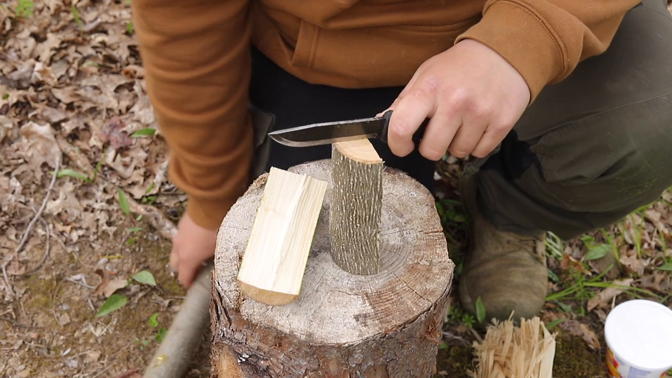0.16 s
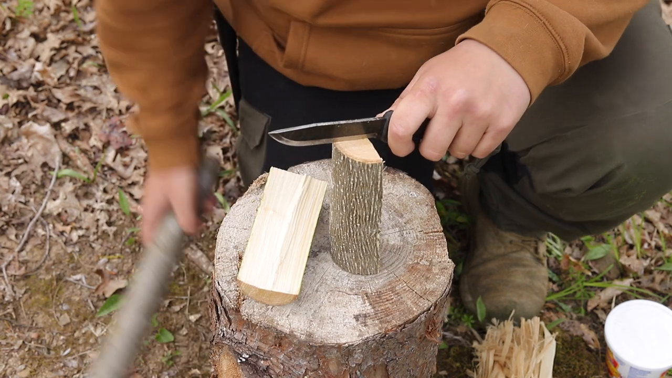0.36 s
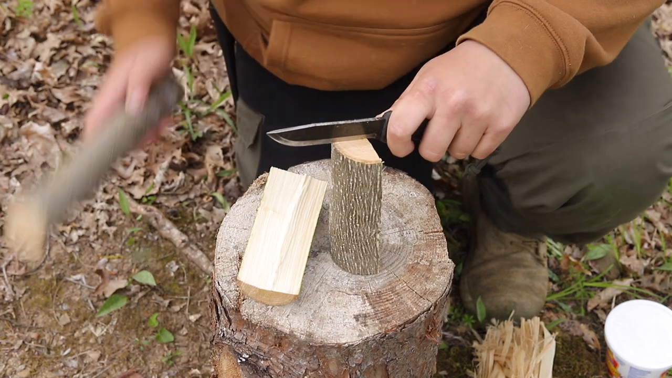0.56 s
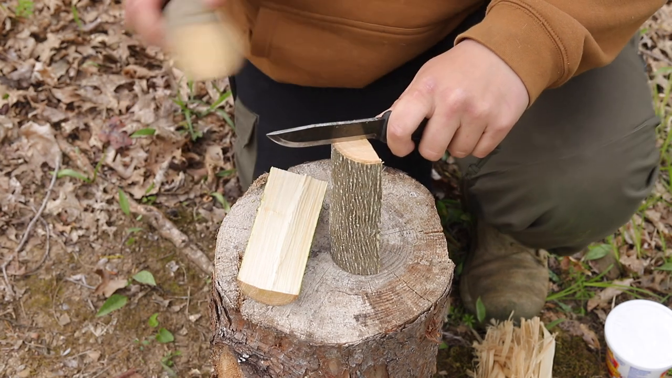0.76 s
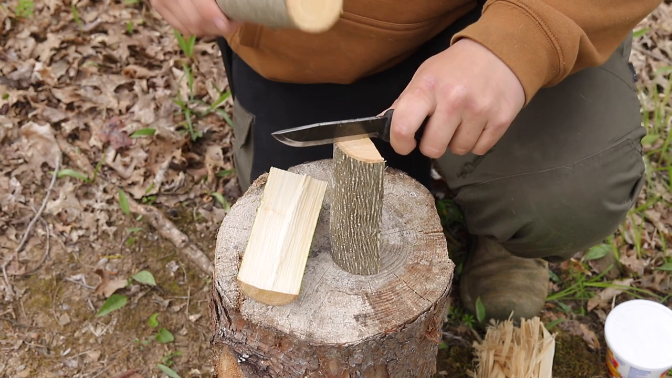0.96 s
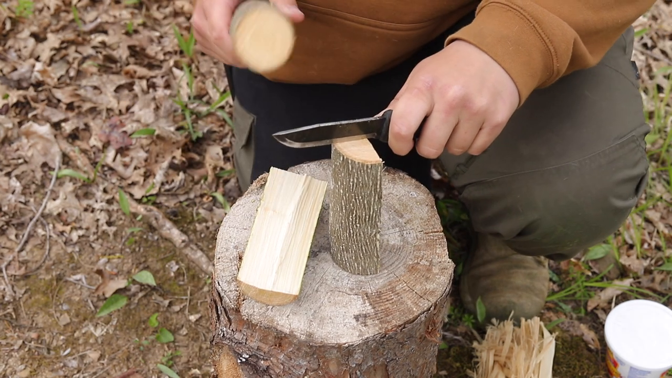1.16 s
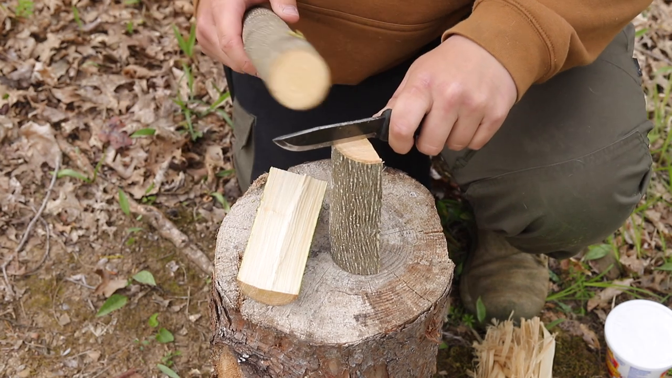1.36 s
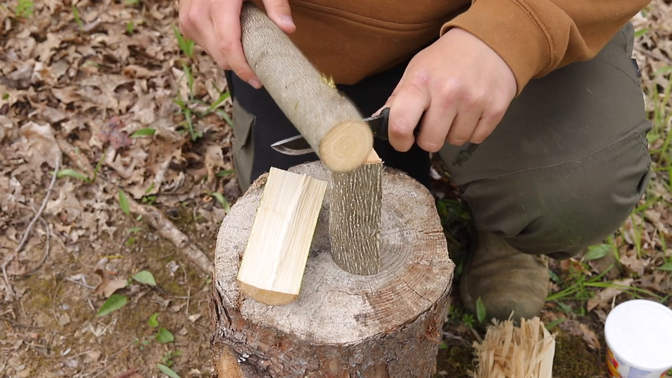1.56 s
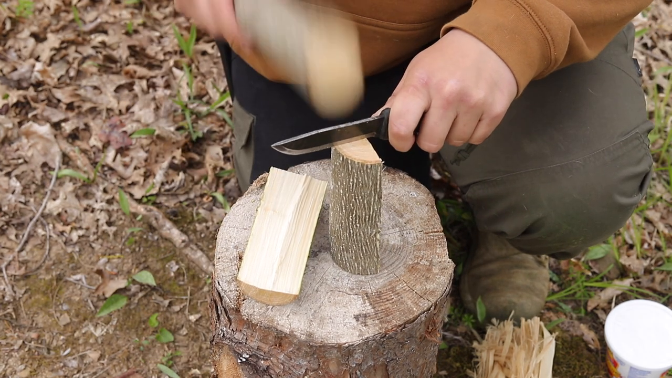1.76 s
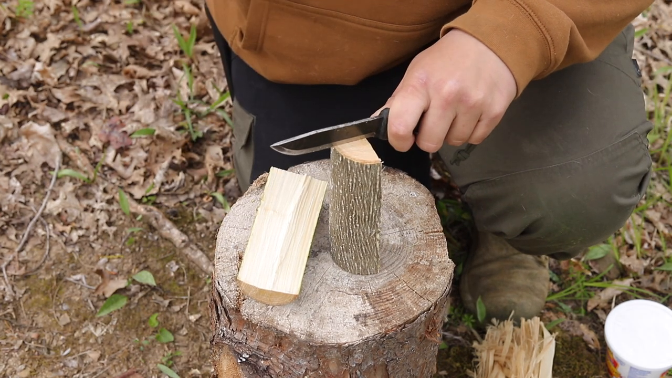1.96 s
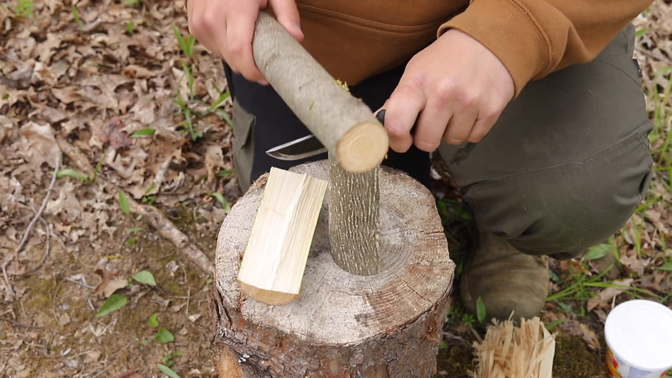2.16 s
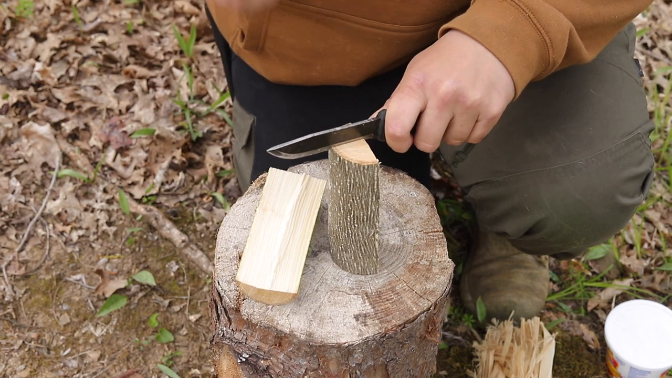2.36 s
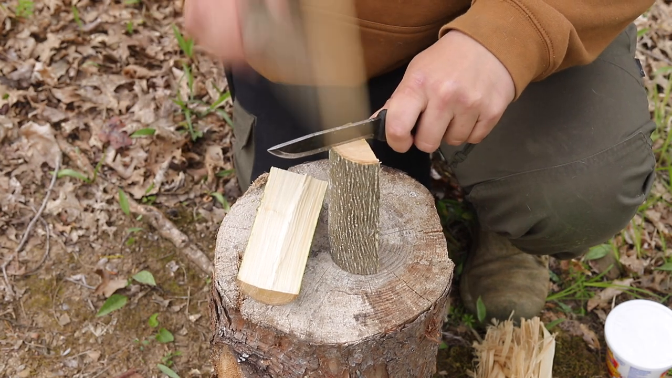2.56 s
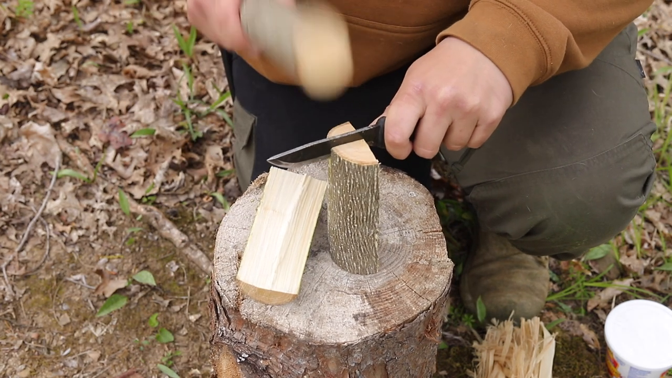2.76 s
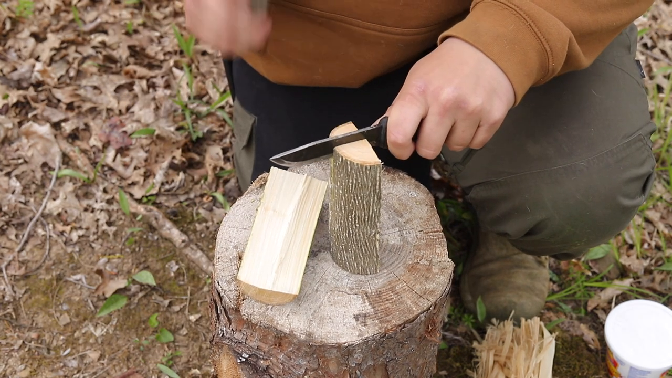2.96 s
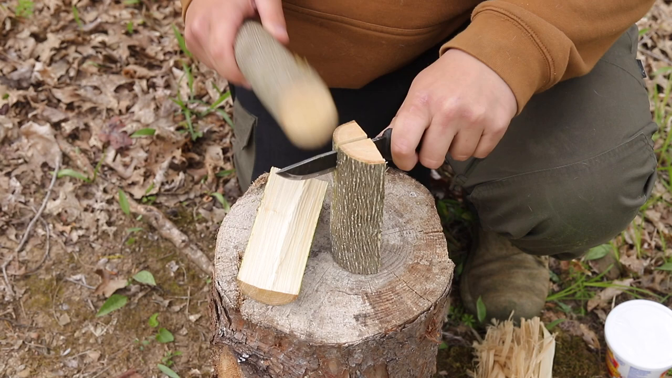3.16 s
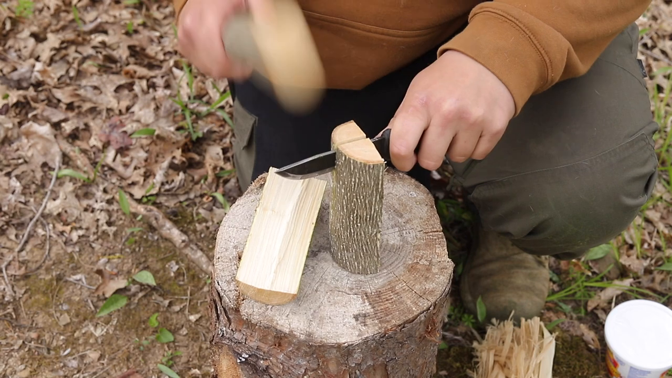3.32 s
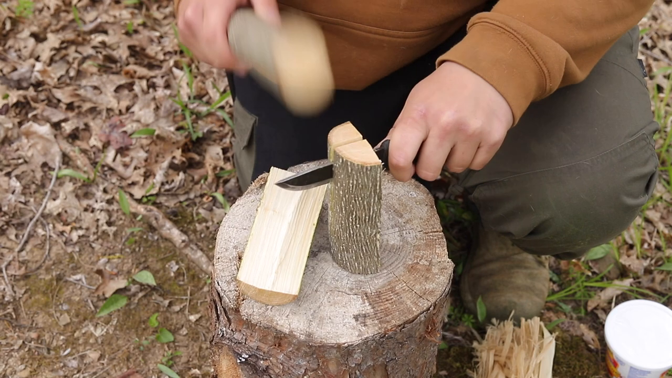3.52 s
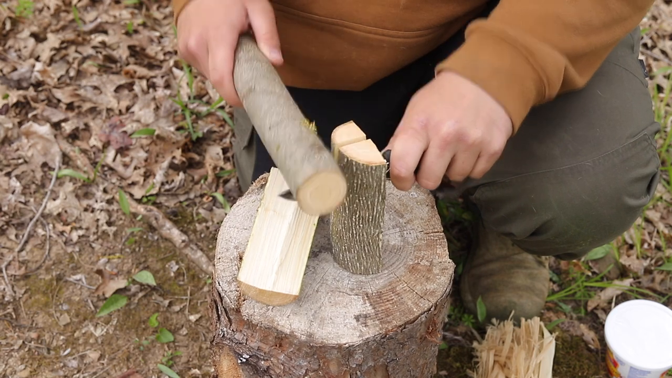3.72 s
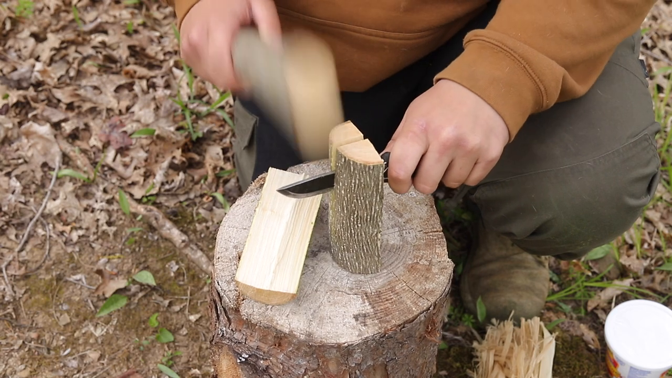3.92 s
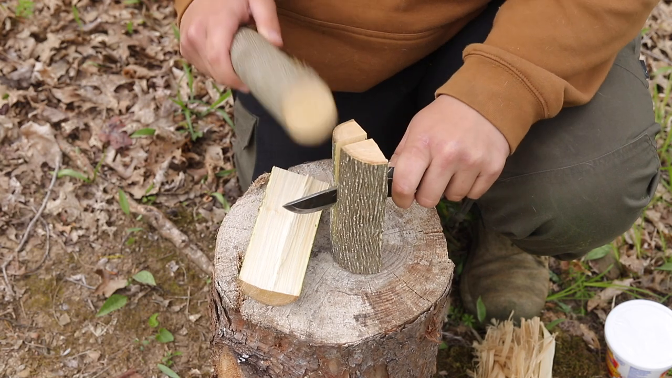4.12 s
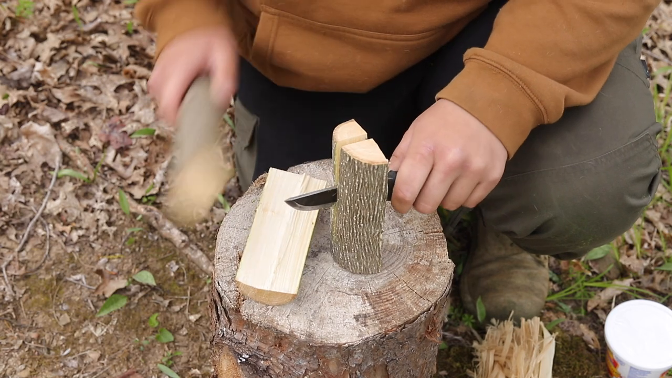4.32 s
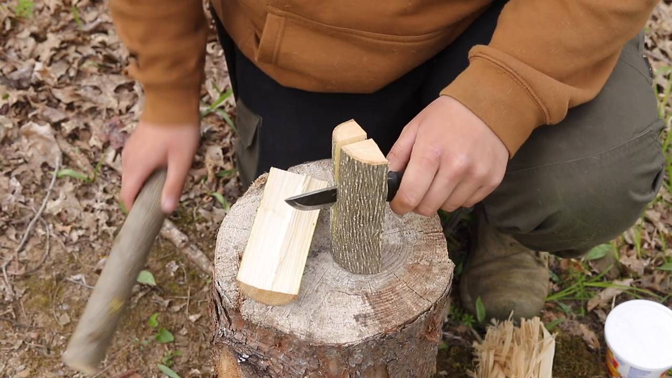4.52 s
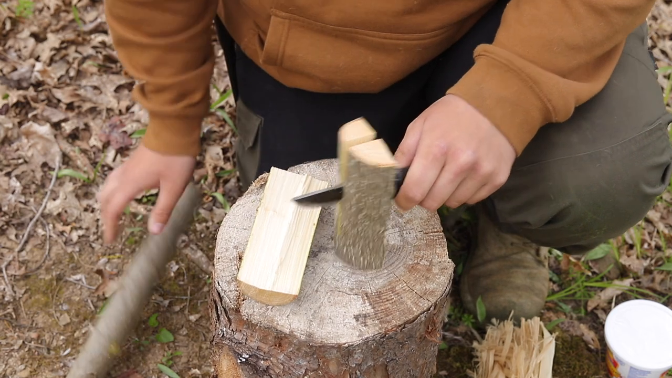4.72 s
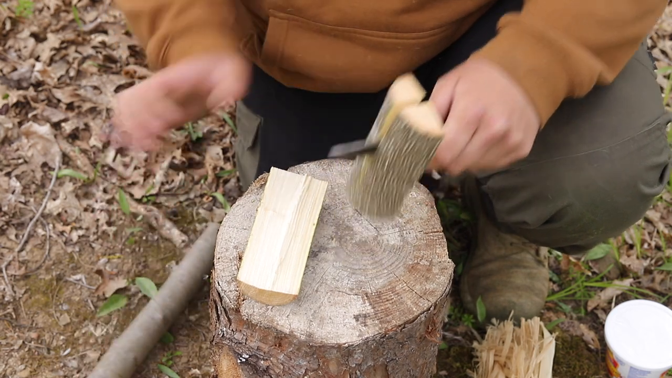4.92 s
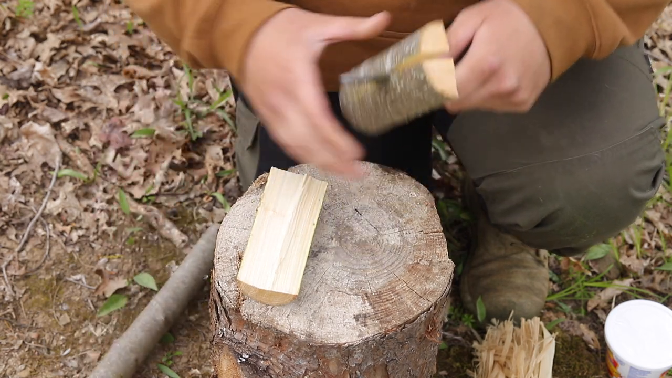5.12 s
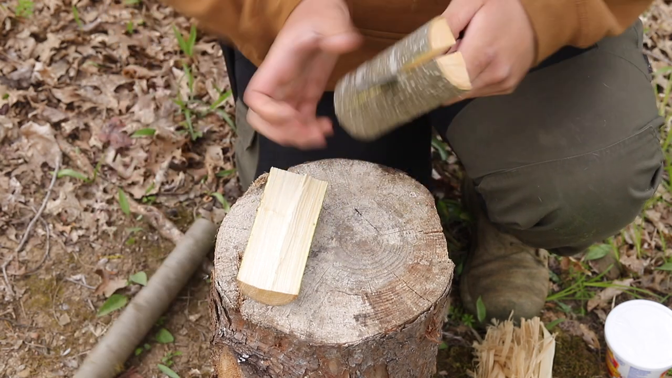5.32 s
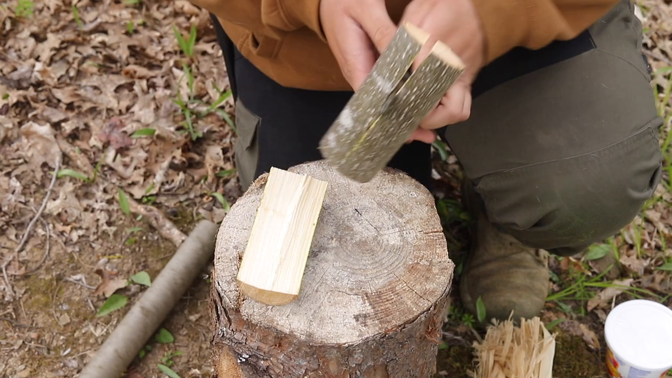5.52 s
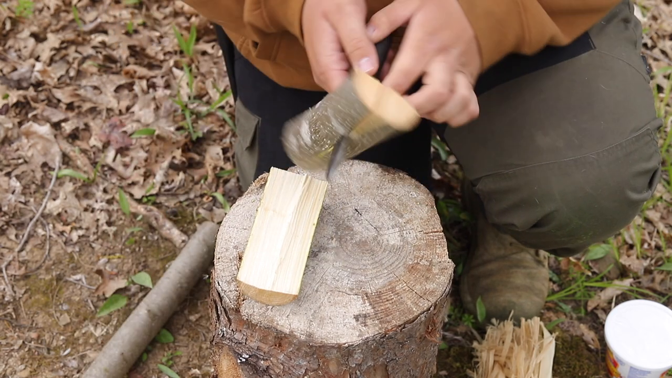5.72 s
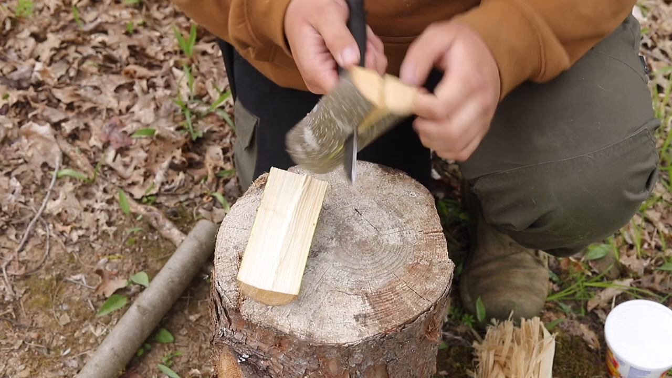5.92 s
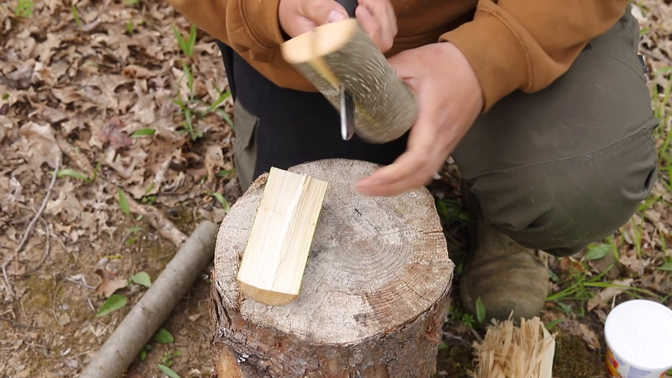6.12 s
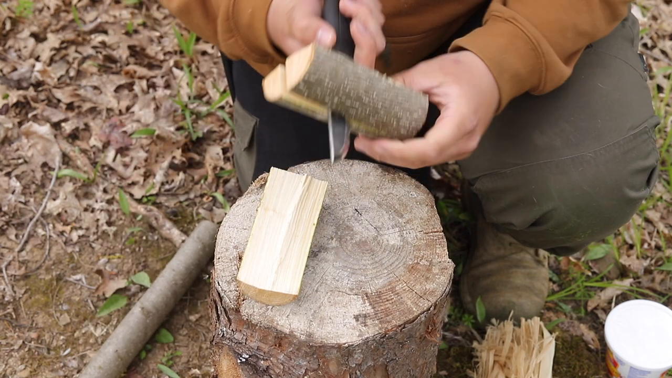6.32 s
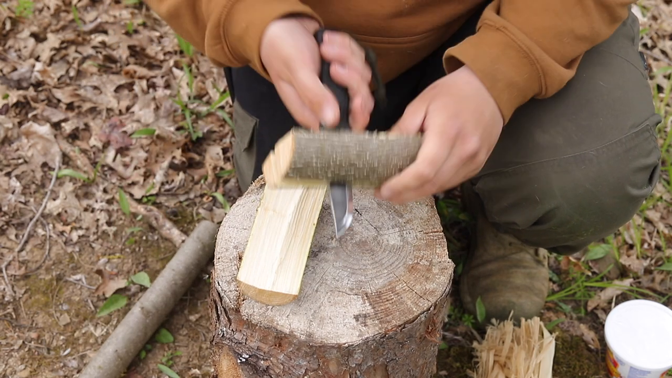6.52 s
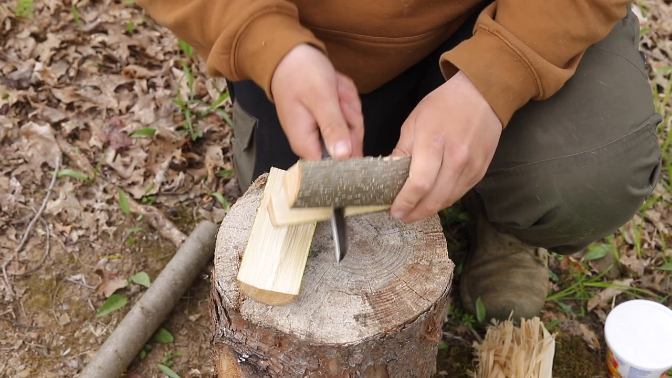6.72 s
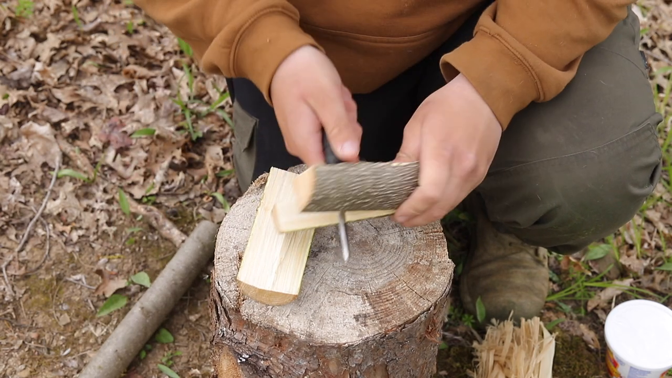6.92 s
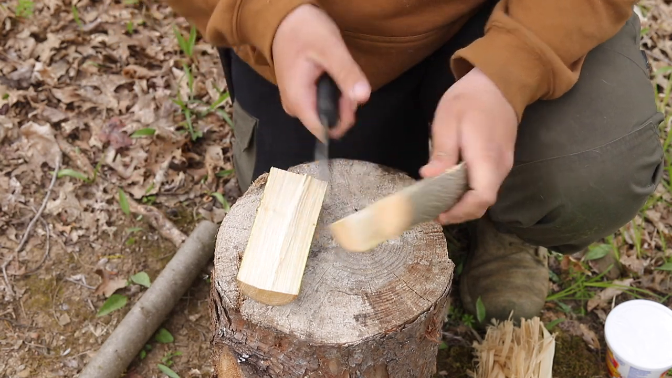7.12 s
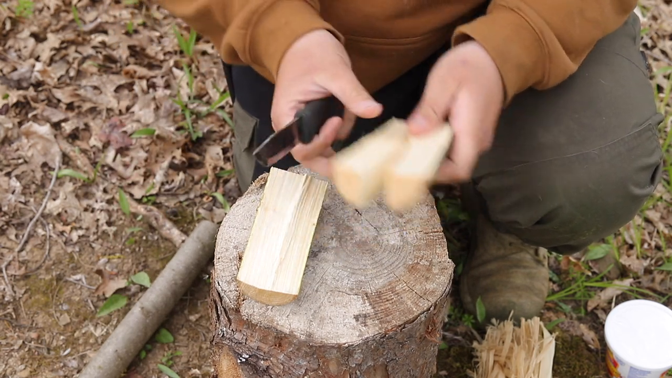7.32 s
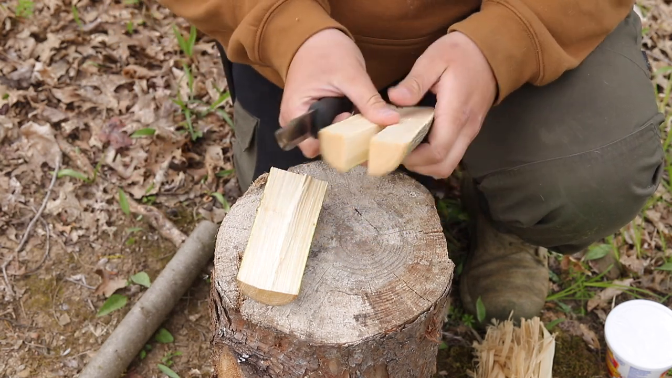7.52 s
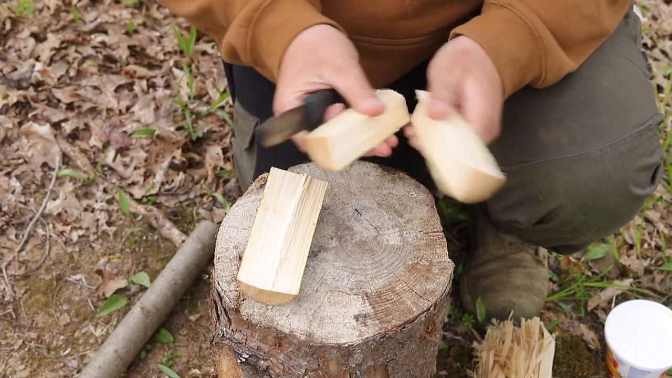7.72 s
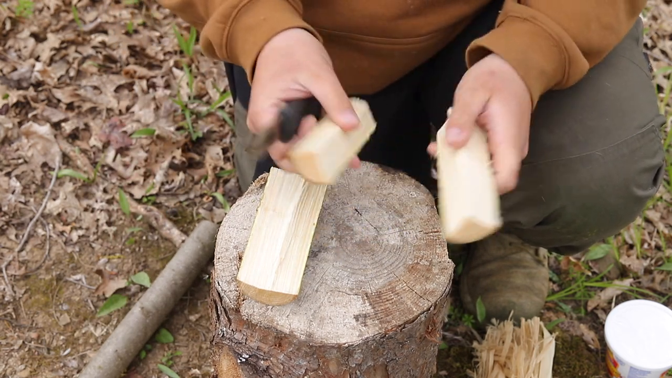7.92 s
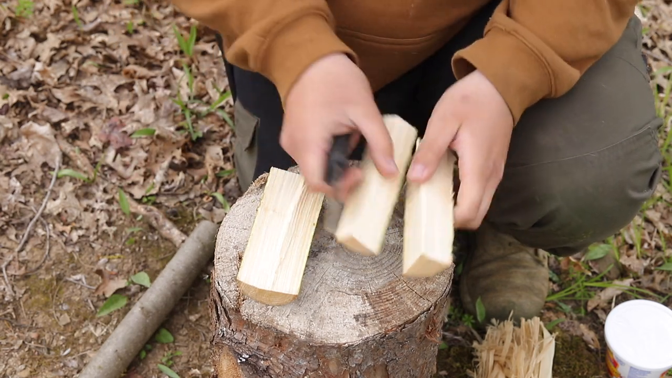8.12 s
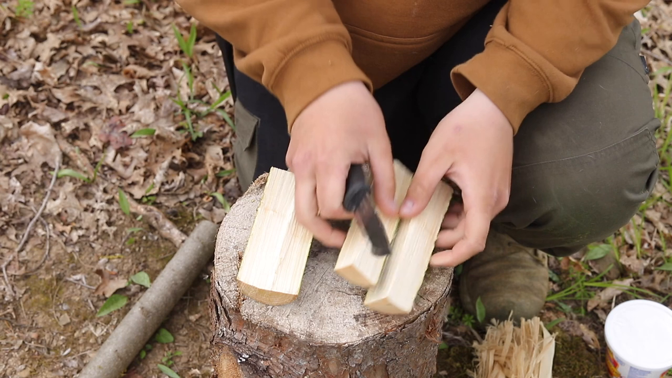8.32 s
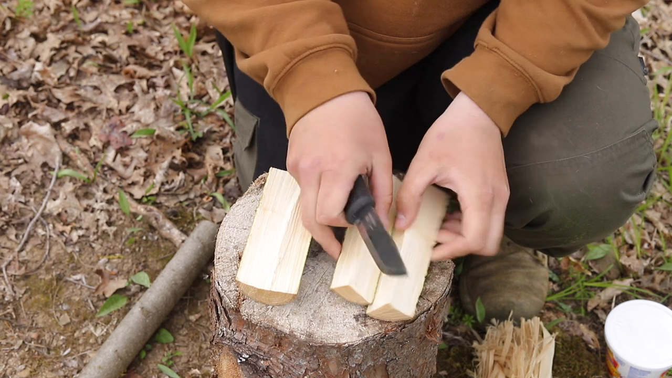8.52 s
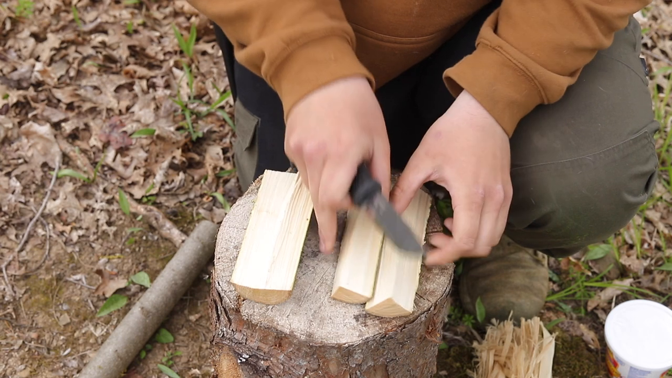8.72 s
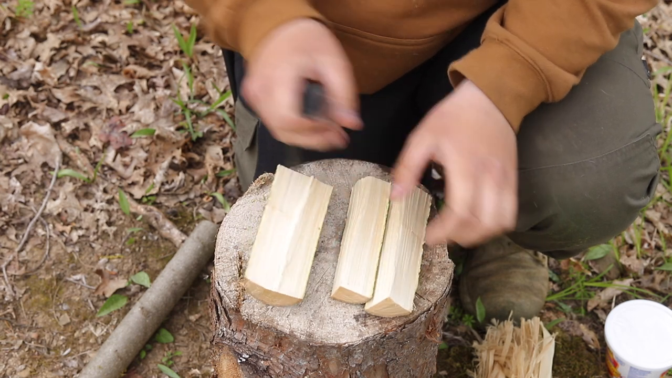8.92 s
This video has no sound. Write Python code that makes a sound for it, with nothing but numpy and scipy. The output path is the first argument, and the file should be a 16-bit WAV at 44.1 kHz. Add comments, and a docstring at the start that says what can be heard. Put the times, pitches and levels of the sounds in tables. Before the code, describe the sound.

Several hard, dry knocks split wood on a stump, followed by a thump on the ground, tearing fibres and light wooden clatter in quiet woods.

```python
"""Log splitting in a wood

Close to the microphone, a stick drives a knife down through a small log on a stump, then drops on dry leaves.
The log is torn apart by hand, its fibres snapping; the halves are rubbed together and set down.
Wood is made of decaying modes driven by short noisy contacts; friction, rips and leaves are filtered grit.
Among the trees a bird calls in gliding sines and a cricket trills as a pulsed tone.
Far off, traffic rumbles as shaped noise that swells; scattered echoes place the blows and the bird in the wood."""
import sys
import numpy as np
from scipy import signal
from scipy.fft import rfft, irfft
from scipy.io import wavfile
from scipy.ndimage import uniform_filter1d

SR = 44100
rng = np.random.default_rng(int(sys.argv[2]) if len(sys.argv) > 2 else 0)


def wav_record(signal):
    """Record a signal, one row per channel, as 16-bit PCM in the file named by sys.argv[1]."""
    frames = np.transpose(np.atleast_2d(signal))
    bounded = np.clip(frames, -1, 1)
    # unit amplitude maps onto the largest positive 16-bit level
    quanta = np.round(bounded * 32767).astype(np.int16)
    wavfile.write(sys.argv[1], SR, quanta)


N = 396138
T = np.arange(N) / SR  # time [s]

# Spectrum of far traffic and air: (frequency [Hz], relative density [dB per Hz])
TRAFFIC_SPECTRUM = [(15, -73.5), (25, -35.5), (78, -7), (114, -0.5), (344, -13.5), (439, -13.5), (677, -23),
                    (863, -20), (1440, -32), (2110, -31), (3430, -36.5), (4250, -39), (4740, -41),
                    (14400, -44.5), (16000, -53)]
# Slow swell of the traffic, before a quick wander: (time [s], bass level [dB], low middle level [dB])
TRAFFIC_SWELL = [(0, -62, -67), (.5, -63, -68), (1.0, -67.5, -68), (1.45, -67, -73), (2.0, -65.5, -70.5),
                 (2.45, -67.5, -76), (2.9, -71, -76), (3.6, -70, -77.5), (4.15, -68.5, -72.5),
                 (4.6, -65, -69.5), (5.1, -63.5, -70), (5.6, -65.5, -71), (6.1, -63.5, -72.5),
                 (6.5, -65, -74.5), (7.0, -68, -78), (7.6, -68, -74.5), (8.3, -69.5, -75),
                 (8.98, -66.5, -74)]
HIGH_MIDDLE_DB, SWELL_SHARE = -79, .45  # mean level; share of the low middle's swell
HISS_DB = -82

TREES_DELAY_S = .012  # time for the late echoes to build up

CRICKET_HZ, CRICKET_RATE_HZ = 4380, 37.2  # tone; mean pulse rate
CRICKET_DB = -90  # mean level

# Whistled calls: (time [s], length factor [1], level [dB])
BIRD_CALLS = [(1.734, 0.62, -67.5), (1.965, 0.97, -63.5), (2.247, 0.84, -65), (6.863, 0.92, -67.5),
              (7.121, 0.97, -66), (7.384, 0.86, -67.5)]
# Course of one whistle: (time before the length factor [s], pitch [Hz], level over the call's [dB])
WHISTLE_COURSE = [(0, 3118, -7), (.012, 2977, 1), (.055, 2920, -2.5), (.075, 2733, 1), (.098, 2200, -1.5),
                  (.105, 2186, -25.5)]
# Short falling chirps: (time [s], start pitch [Hz], end pitch [Hz], length [s], level [dB])
BIRD_CHIRPS = [(4.273, 3550, 2700, .032, -69), (8.767, 3750, 2850, .032, -66)]

RUSTLE_DB, BODY_DB = -88, 1.5  # mean level of leaves and sleeves; their dull body over the crackle
# Fibres rip, sleeves and bark brush:
# (time [s], peak level [dB], 20 dB rise [s], 20 dB fall [s], coarse over fine fibres [dB])
RIPS = [(.388, -80, .02, .03, 3), (.458, -78, 0.036, 0.037, 3), (.64, -83, .1, .1, 7),
        (4.896, -69, .06, .04, -1.5), (4.93, -72, .01, .04, -2.5), (5.316, -80, .06, .015, 2.5),
        (5.35, -83, .02, .15, 3), (5.6, -78, .12, .12, 1.5), (5.7, -86, .1, .15, 9),
        (5.836, -78, .06, .025, 7), (5.912, -76, .04, .03, 4.5), (6.196, -71, .03, .03, 5.5),
        (6.2, -84, .15, .2, 7), (6.68, -69, .07, .05, 5.5), (6.733, -52.5, .011, .028, -.5),
        (6.76, -70, .03, .06, 8), (6.868, -76, 0.016, .1, 3), (7.05, -80, .03, .04, 9),
        (7.112, -81, .08, .04, 11), (7.478, -76, .025, .03, 4), (7.722, -69, .03, .04, 2.5),
        (7.794, -67.5, .006, .02, 6), (7.932, -76, .07, .09, 3), (8.26, -83, .1, .4, 1.5),
        (8.48, -81, .3, 0.17, 4), (8.64, -80, .15, .2, 4.5)]

ROUNDNESS = 1.1  # of a stroke: 1 pointed, 2 domed
# Friction of the stick; a negative fall ends the stroke before its peak:
# (time [s], peak level [dB], 20 dB rise [s], 20 dB fall [s])
STICK_STROKES = [(0.01, -78, .05, .08), (0.224, -71.5, 0.15, -0.1), (0.316, -75, 0.3, 0.1),
                 (0.464, -76, 0, 0.1), (0.62, -74.5, .05, .04), (0.68, -75, .05, .03), (4.5, -86, .5, .5),
                 (4.764, -59.5, .05, .045), (4.74, -76, .12, .2), (4.91, -70.5, 0.38, 0.06)]
# Dull scuffing: (time [s], peak level [dB], 20 dB rise [s], 20 dB fall [s])
SCUFF_STROKES = [(0.1, -75, .5, 0.44), (0.23, -73, .1, .25), (0.62, -81, .15, 0.16), (2.35, -74, .6, .6),
                 (4.47, -80, .4, .5), (4.76, -69, .25, .3), (4.93, -66, .35, .15)]
# Rubbing of the halves: (time [s], peak level [dB], 20 dB rise [s], 20 dB fall [s])
HALVES_STROKES = [(7.714, -60.5, 0.0075, 0.029), (7.78, -70.5, .07, 0.081), (7.905, -70, .02, .1),
                  (7.95, -68, .08, .04), (8.012, -70, .006, .015), (8.05, -78, .06, .08),
                  (8.318, -69.5, .17, .12), (8.412, -64.5, .02, .03), (8.502, -71, .15, .1),
                  (8.6, -71, .03, .03), (8.655, -67, .05, .04), (8.74, -64, .01, .03),
                  (8.77, -64, .01, .05)]
# Creaking: (time [s], peak level [dB], 20 dB rise [s], 20 dB fall [s])
CREAK_STROKES = [(7.088, -59.5, .05, .03), (7.13, -64.5, 0.14, 0.017)]
TOP_MODE_DB = -15  # top mode of the halves over the rub

# Modes of the split halves: (frequency [Hz], t60 [s], share [dB])
HALVES_MODES = [(1800, 0.006, -4), (2880, 0.019, 0.5), (4039, 0.0042, 0.5), (5900, .009, -10)]
# Wood rocks or is set down on the stump, the dropped stick thumps on the ground:
# (time [s], low mode [Hz], low peak [dB], middle peak [dB], edge peak [dB])
WOOD_KNOCKS = [(2.232, 296, -44, -47, -56), (2.249, 298, -44, -64.5, -58), (2.724, 403, -57, -70, -62),
               (3.122, 300, -47, -60, -64), (3.452, 260, -45.5, -63, -71), (4.839, 119.5, -34.5, -70, -75),
               (8.676, 375, -45, -70, -53), (8.7344, 384, -49, -45, -48), (8.763, 368, -41, -75, -37.5),
               (8.789, 380, -53, -74, -64)]
# Fibres snap, halves tick:
# (time [s], click peak [dB], ring over the click [dB], lean of the ring from second mode to third [dB])
FIBRE_SNAPS = [(0.7831, -55.5, -19, -6), (3.1246, -34.5, -7.5, 8), (3.1324, -44, -7, 4),
               (3.2789, -55, -2.5, -6), (3.4464, -50.5, -3, .5), (3.459, -52, -4, -9),
               (3.4635, -52, -0.5, 8), (3.692, -63, -1.5, -4), (3.769, -45.5, 5.5, -7),
               (3.7818, -55.5, -2.5, -2.5), (3.7914, -60, 0, 3), (4.046, -42.5, -10, -5),
               (4.0719, -58, -5, -9), (4.6554, -64, -7, -1.5), (4.8884, -49, -16, -4),
               (4.9329, -48.5, -18, -3), (5.5139, -61.5, -9, -5), (5.5675, -60, -17, -8),
               (5.8395, -63, -2, -8), (6.6365, -47.5, -4, 6), (6.6752, -41.5, -7.5, .5),
               (6.688, -46, -16, -8), (6.722, -56, -9, 6), (6.733, -45, -7, 27.5), (6.7428, -47, -9, 14),
               (6.7554, -54, 1, 9), (6.769, -53.5, -3.5, 14), (6.871, -53, -9.5, 2.5),
               (6.8915, -50.5, -3.5, 7), (6.9022, -49, -10, 0), (6.9731, -57.5, -1.5, 6),
               (7.0864, -58, -1, 8), (7.1081, -60.5, 1, 3), (7.679, -54.5, -5.5, -5),
               (7.7144, -45.5, -14, -3), (7.7253, -49, -9, -10), (7.744, -47, -10, -16),
               (7.7707, -57, -4, -1.5), (7.7948, -42.5, -14, -16), (8.3105, -55, -2.5, -11),
               (8.422, -60, -8, -3), (8.5274, -64, -4, -11)]

# Bending modes of the stick: (frequency [Hz], t60 at freedom 1 [s], share [dB])
STICK_MODES = [(949, 0.057, 0), (2093, 0.031, 0), (3280, 0.02, -9), (4930, 0.017, -18.5)]
# Modes of the log on its stump: (frequency [Hz], t60 [s], share [dB])
LOG_MODES = [(780, 0.021, .5), (1200, .012, 1), (1540, 0.016, -2.5), (1874, .012, -1.5)]
# Blows and the fall of the stick:
# (time [s], contact [ms], freedom of the stick to ring [0-3], stick level [dB],
#  its lowest mode over that [dB], its upper two modes over that [dB], log level [dB], log tilt [dB per octave],
#  hollow note of the wood on its seat [Hz], its peak [dB], crack peak [dB], fine crack over that [dB],
#  clack of the blade over the crack [dB], ground thud peak [dB])
STICK_BLOWS = [ (0.2172, 0.41, 0.93, -45.5, -33, -1.5, -73, 3, 400, -70, -64, 5.5, 1.5, -75),
               (1.6286, 0.49, 1.2, -62.5, -7, 14, -45, -12, 275, -36.5, -64, -15, 3, -50),
               (2.1908, 3.4, 0.82, -9.5, -21, 5, -17.5, -1.5, 275, -16, -25.5, 3.5, 12, -42),
               (2.6499, 6, 0.85, -16, -3, 12, -12.5, -.7, 360, -15, -13, -3, -7, -47),
               (3.1004, 2.92, 0.78, -7, -20, -4.5, -16, -.7, 420, -24, -33.5, -8, .5, -55.5),
               (3.4346, 4.3, 0.84, -17, 1, -13, -20, 3.5, 420, -28, -34.5, -9, .5, -58.5),
               (3.7390, 1.84, 0.89, -48, 6, 12, -37, -3, 300, -38, -45.5, 6, -3, -64.5),
               (3.7423, 4.7, 0.73, -26.5, 9, -.5, -19.5, 1.5, 320, -24, -40, -30, -13, -53),
               (4.024, 5.4, 0.95, -32, 17, 7, -16.5, 8, 440, -26, -26.5, -40, -6, -68.5),
               (4.7561, 4.8, 1.3, -56, -3, 3, -62, 1.5, 320, -42, -46.5, 1.5, -6, -59),
               (4.833, 1.11, 2.05, -32, 2.5, -20, -37, 1.5, 365, -25, -53, 16, 5, -50)]
HOLLOW_T60_S = .022

TOP_HZ = 16300  # upper limit of the microphone chain


def undb(db):
    """Amplitude factor of a level in dB."""
    return 10 ** (np.asarray(db) / 20)


def band(x, lo_hz, hi_hz, order=2):
    """Keep the range between two frequencies."""
    return signal.sosfilt(signal.butter(order, [lo_hz, hi_hz], "band", fs=SR, output="sos"), x)


def unit(x):
    """Scale to an RMS of 1."""
    return x / np.sqrt(np.mean(x ** 2))


def peak(x, db):
    """Scale to a peak level."""
    return x * undb(db) / np.abs(x).max()


def ring(push, hz, t60):
    """One decaying mode driven by a force."""
    pole = np.exp(2j * np.pi * hz / SR - np.log(1000) / (t60 * SR))
    return signal.lfilter([1], [1, -pole], push).imag


def add(out, s, sound):
    """Mix a sound in at s seconds."""
    i = int(s * SR)
    out[i:i + len(sound)] += sound[:N - i]


def walk(rate):
    """Random levels held 1 / rate s and slewed; RMS 1."""
    k = int(SR / rate)
    held = np.repeat(rng.standard_normal(N // k + 1), k)
    slewed = uniform_filter1d(uniform_filter1d(held, k), k)
    return unit(slewed[:N])


def grit(rate, spread_db):
    """Clicks at random moments, rate per second on average, of very unequal size."""
    hits = rng.random(N) < rate / SR
    sizes = undb(spread_db * np.minimum(rng.exponential(size=N), 3.5))
    return unit(hits * rng.standard_normal(N) * sizes)


def strokes(rows):
    """Gain of strokes that rise to a peak and fall away, with a rounded top; the loudest one wins."""
    out = np.zeros(N)
    for s, db, rise, fall in rows:
        span = slice(max(int((s - 2 * rise) * SR), 0), int((s + 2 * fall) * SR))
        t = T[span]
        away = np.where(t < s, (s - t) / rise, (t - s) / fall)
        out[span] = np.maximum(out[span], undb(db - 20 * away ** ROUNDNESS))
    return out


def distance():
    """Far traffic and air as shaped noise: bass and middles swell, the hiss stays even."""
    hz, db = np.transpose(TRAFFIC_SPECTRUM)
    f = np.arange(N // 2 + 1) * SR / N + 1  # 1 Hz up, to allow the logarithm
    noise = rfft(rng.standard_normal(N)) * undb(np.interp(np.log(f), np.log(hz), db))

    def part(lo_hz, hi_hz):
        """One range of the noise at RMS 1."""
        return unit(irfft(noise * (f >= lo_hz) * (f < hi_hz), N))

    edges = (0, 220, 600, 1500)  # Hz
    ts, *dbs = np.transpose(TRAFFIC_SWELL)
    bass_db, low_db = (np.interp(T, ts, db) for db in dbs)
    high_db = HIGH_MIDDLE_DB + SWELL_SHARE * (low_db - low_db.mean())
    swells = np.zeros(N)
    for k, db in enumerate((bass_db, low_db, high_db)):
        swells += undb(db + 1.1 * walk(7)) * part(edges[k], edges[k + 1])
    return swells + undb(HISS_DB) * part(edges[-1], SR)


def trees(x, t60, early):
    """Scattered echoes: a quick bright flurry from ground and legs, a late dull tail from the trunks."""
    t = T[:SR]
    late = unit(band(rng.standard_normal(SR), 580, 3100, order=1)) * np.exp(-np.log(1000) * t / t60)
    late *= np.clip(t / TREES_DELAY_S, 0, 1) ** 2
    flurry = unit(band(rng.standard_normal(SR), 800, 8100, order=1)) * np.exp(-t / 0.013)
    echo = late + early * flurry
    return signal.fftconvolve(x, echo / np.sqrt(SR))[:N]


def cricket():
    """A trill of short wing pulses on a tone with a noisy edge."""
    rate_hz = CRICKET_RATE_HZ * (1 + 0.0073 * walk(2))
    pulse = np.maximum(np.sin(2 * np.pi * np.cumsum(rate_hz) / SR) + .5, 0)
    rasp = unit(band(rng.standard_normal(N), CRICKET_HZ - 300, CRICKET_HZ + 150))
    tone = np.sin(2 * np.pi * CRICKET_HZ * T) + 0.42 * rasp
    return unit(pulse * tone) * undb(CRICKET_DB + 1.2 * walk(2.5))


def birds():
    """Held whistles that drop at the end, and short falling chirps with an overtone, all gliding sines."""
    out = np.zeros(N)
    ts, hz, dbs = np.transpose(WHISTLE_COURSE)
    for s, stretch, db in BIRD_CALLS:
        t = T[:int(ts[-1] * stretch * SR)] / stretch
        phase = 2 * np.pi * np.cumsum(np.interp(t, ts, hz)) / SR
        add(out, s, undb(db + np.interp(t, ts, dbs)) * np.sqrt(2) * np.sin(phase))
    for s, from_hz, to_hz, length, db in BIRD_CHIRPS:
        u = T[:int(length * SR)] / length
        glide_hz = to_hz + (from_hz - to_hz) * (1 - u) ** 1.5
        phase = 2 * np.pi * np.cumsum(glide_hz) / SR
        voice = np.sin(phase) + 0.7 * u * np.sin(2 * phase)  # the overtone grows
        add(out, s, undb(db) * np.sqrt(2) * np.sin(np.pi * u) * voice)
    return out


def rustle():
    """Dense crackle with a duller body comes and goes; ripping fibres and brushing bark have two grains."""
    crackle = unit(band(grit(2800, 2.8), 4500, 19000))
    body = unit(band(grit(2000, 1.8), 970, 2800, order=1))
    fibres = grit(5000, 2.0)
    fine = unit(band(fibres, 4240, 15100))
    coarse = unit(band(fibres, 1630, 4970))
    fine_rows = [row[:4] for row in RIPS]
    coarse_rows = [(s, db + coarse_db, rise, fall) for s, db, rise, fall, coarse_db in RIPS]
    rip = strokes(fine_rows) * fine + strokes(coarse_rows) * coarse
    return undb(RUSTLE_DB + 1.2 * walk(3)) * (crackle + undb(BODY_DB) * body) + rip


def rubbing():
    """Grit between sliding faces rings whichever piece slides."""
    sand = grit(1100, 1.9)
    drag = unit(ring(sand, *STICK_MODES[1][:2]))
    scuff = unit(band(sand, 1050, 1700))
    rub = undb(-11) * unit(band(sand, 1800, 9200, order=1))
    for mode, db in zip(HALVES_MODES, (-10, .5, -14)):  # lower three modes
        rub += undb(db) * unit(ring(sand, *mode[:2]))
    top = unit(band(ring(sand, *HALVES_MODES[3][:2]), 5200, 6100))
    creak = unit(band(ring(sand, 1818, 0.022), 1800, 2220))
    creak += undb(-9) * unit(band(sand, 940, 1270))
    halves = strokes(HALVES_STROKES) * (rub + undb(TOP_MODE_DB) * top)
    stick = strokes(STICK_STROKES) * drag + strokes(SCUFF_STROKES) * scuff
    return stick + halves + strokes(CREAK_STROKES) * creak


def knocks():
    """A soft contact rings a hollow low note, the body of the piece and its edge."""
    out, t = np.zeros(N), T[:SR // 10]
    for s, hz, low_db, middle_db, edge_db in WOOD_KNOCKS:
        push = np.exp(-t / 0.00054) * (1 + .5 * rng.standard_normal(len(t)))
        low = peak(ring(push, hz, 0.019), low_db)
        middle = peak(ring(push, 910, 0.012), middle_db)
        edge = ring(push, *HALVES_MODES[1][:2]) - ring(push, *HALVES_MODES[0][:2])
        add(out, s, low - middle + peak(edge, edge_db))
    return band(out, 80, 15000)


def snaps():
    """A click of about a millisecond with a frayed end rings the split wood."""
    out, t = np.zeros(N), T[:SR // 16]
    for s, db, ring_db, lean_db in FIBRE_SNAPS:
        click = (np.exp(-t / .001) + .1 * np.exp(-t / .006)) * rng.standard_normal(len(t))
        sound = peak(band(click, 1600, 16000), 0)
        for (hz, t60, share_db), lean in zip(HALVES_MODES, (0, -0.59, .5, 0)):
            sound += peak(ring(click, hz, t60), ring_db + share_db + lean_db * lean)
        add(out, s, undb(db) * sound)
    return out


def blows():
    """Stick and blade chatter while in touch, the stick rings on, the ground answers late."""
    out, t = np.zeros(N), T[:SR // 3]
    for (s, contact_ms, freedom, stick_db, lowest_db, upper_db, log_db, tilt, hollow_hz, hollow_db,
         crack_db, fine_db, clack_db, thud_db) in STICK_BLOWS:
        contact = t * 1000 / contact_ms  # 1 when the touch ends
        touch = np.sin(np.pi * np.clip(contact, 0, 1) ** .55) ** 1.5
        push = np.exp(-((t - .0003) / .00012) ** 2) + .45 * touch * rng.standard_normal(len(t))

        # neighbouring modes start in opposite directions; a gripping hand shortens the ring of the stick
        wood = np.zeros(len(t))
        over_db = (lowest_db, 0, upper_db, upper_db)
        for k, (hz, t60, db) in enumerate(STICK_MODES):
            wood += (-1) ** k * peak(ring(push, hz, t60 * freedom), stick_db + db + over_db[k])
        for k, (hz, t60, db) in enumerate(LOG_MODES):
            tilt_db = tilt * np.log2(hz / STICK_MODES[0][0])
            wood += (-1) ** k * peak(ring(push, hz, t60), log_db + db + tilt_db)
        wood += peak(ring(push, hollow_hz, HOLLOW_T60_S), hollow_db)

        # tearing fibres: builds over the contact, dies fast, splinters patter on
        tear = np.minimum(contact * 3.4, 1) * (np.exp(-t / 0.0033) + 0.025 * np.exp(-t / 0.015))
        splinters = undb(3.0 * np.repeat(rng.standard_normal(len(t) // 100), 100))
        patter = tear + (0.013 * np.exp(-t / 0.012) + 0.0029 * np.exp(-t / .09)) * splinters
        wood += peak(band(patter * rng.standard_normal(len(t)), 2600, 5600), crack_db)
        wood += peak(band(tear * rng.standard_normal(len(t)), 7500, 15500), crack_db + fine_db)
        wood += peak(ring(push, 2720, .008), crack_db + clack_db)  # clack of the blade
        wood = band(wood, 140, 17000)  # a small object radiates no deep bass

        late = np.maximum(t - .012, 0)
        shake = (1 - np.exp(-late / .008)) * (np.exp(-late / .02) + .3 * np.exp(-late / .08))
        ground = np.sin(2 * np.pi * 66 * late) + 0.55 * unit(band(rng.standard_normal(len(t)), 40, 120))
        add(out, s, wood + peak(shake * ground, thud_db))
    return out


def scene():
    """All sources in one channel, with echoes of the blows and the bird from the trees."""
    hits, song = blows(), birds()
    echoes = undb(-34.5) * trees(hits, t60=0.53, early=10.0)
    echoes += undb(6) * trees(song, t60=.7, early=0)
    background = distance() + cricket() + song + echoes
    handling = rustle() + rubbing() + knocks() + snaps()
    return (background + handling + hits)[None]


def record(dry):
    """The microphone chain cuts the very top."""
    return signal.sosfilt(signal.ellip(10, .2, 80, TOP_HZ, fs=SR, output="sos"), dry)


dry = scene()
out = record(dry)
wav_record(out)
```